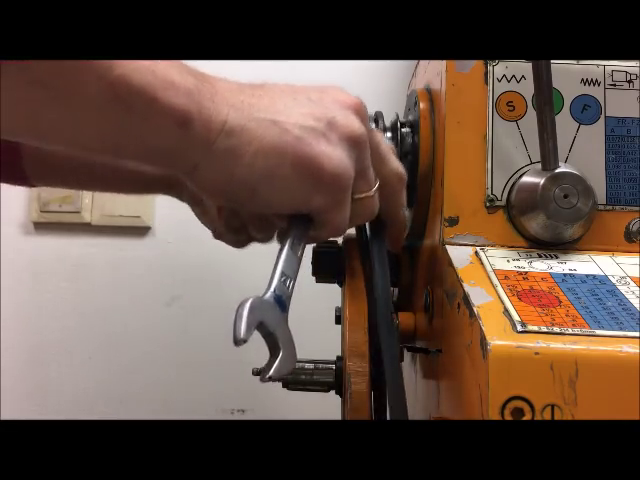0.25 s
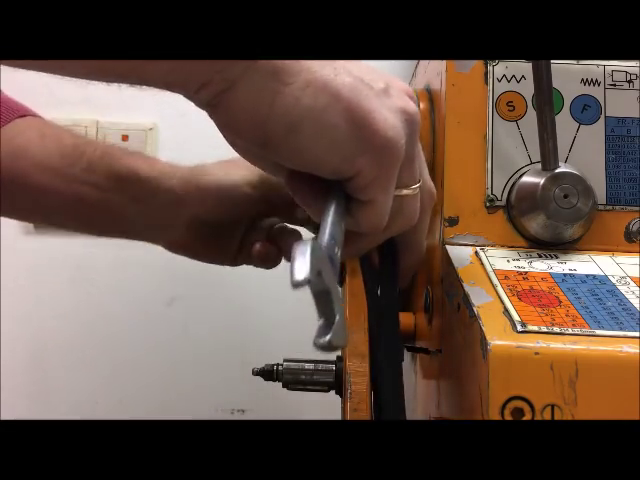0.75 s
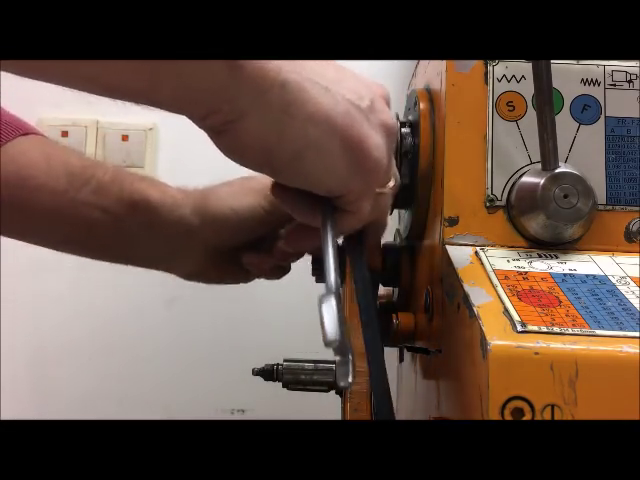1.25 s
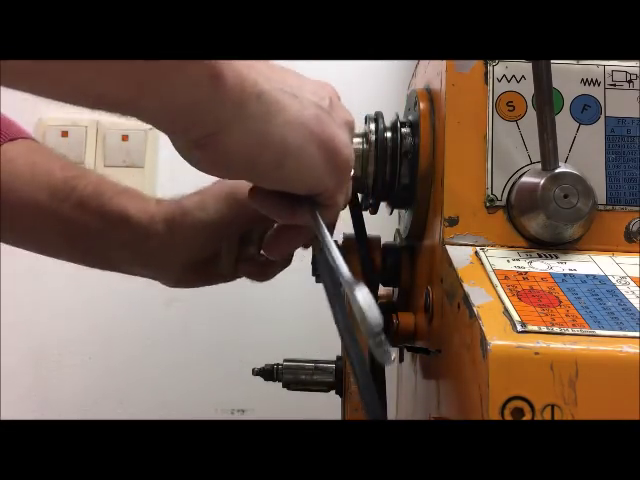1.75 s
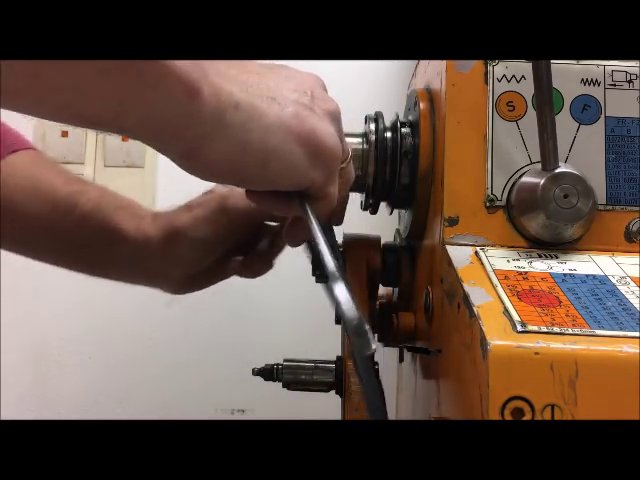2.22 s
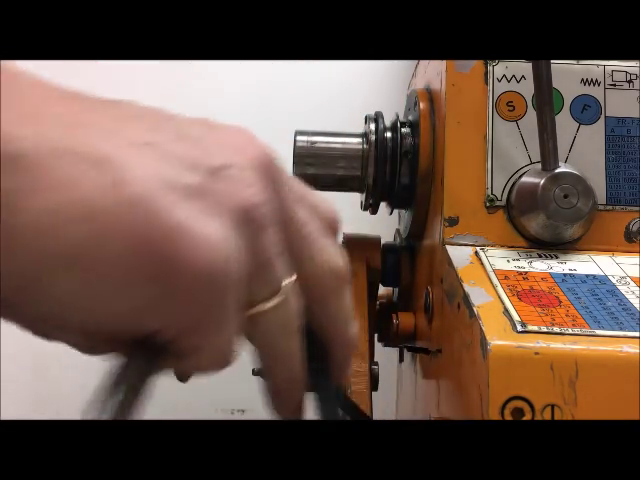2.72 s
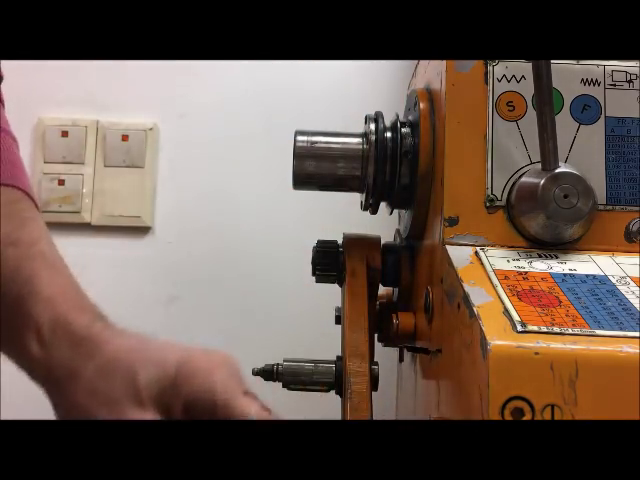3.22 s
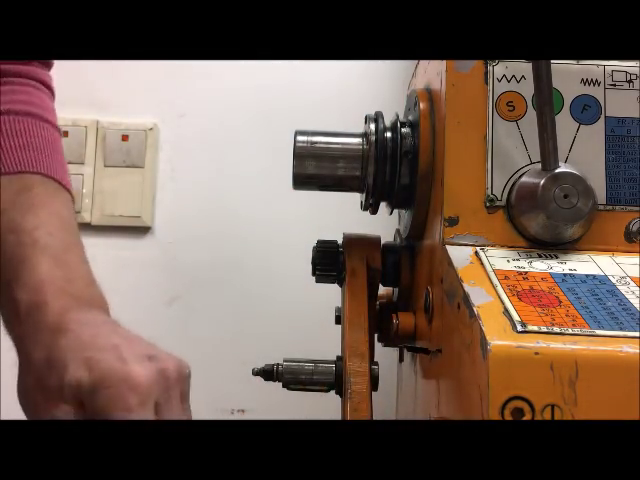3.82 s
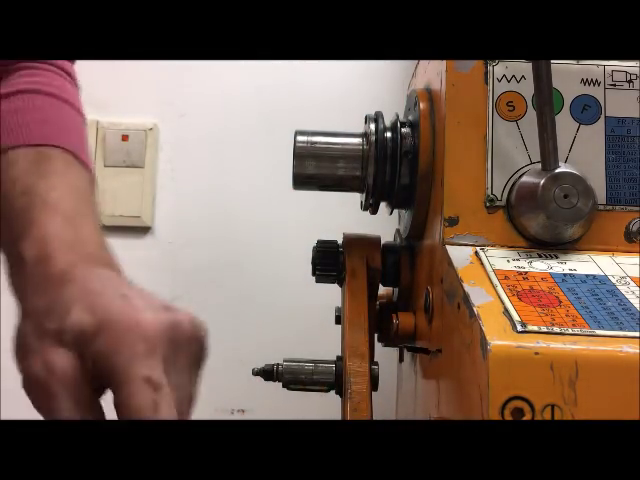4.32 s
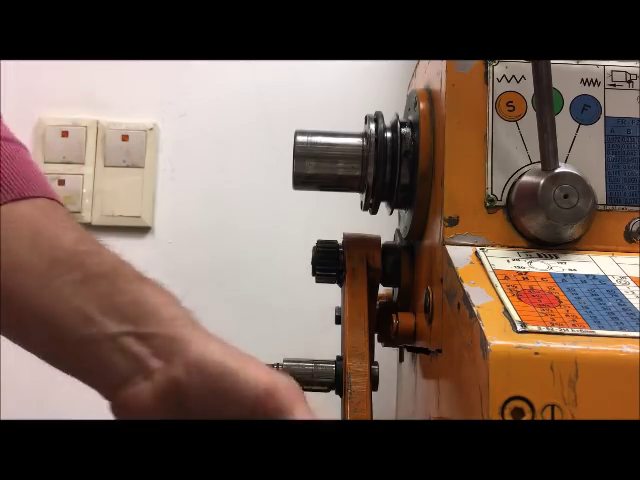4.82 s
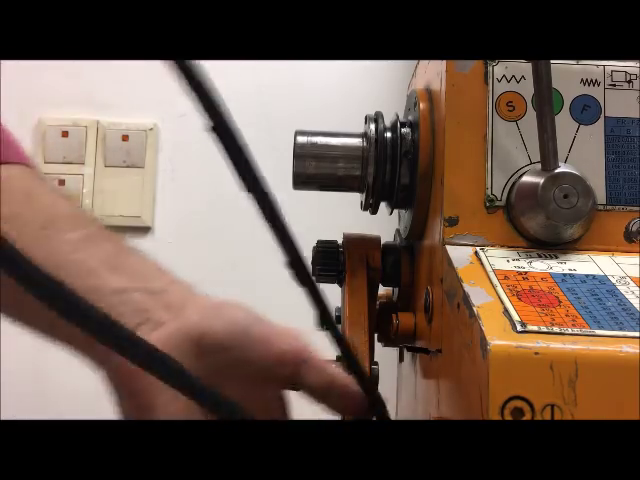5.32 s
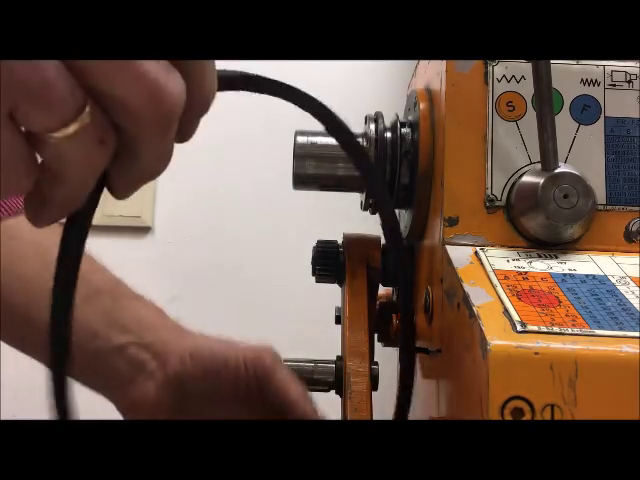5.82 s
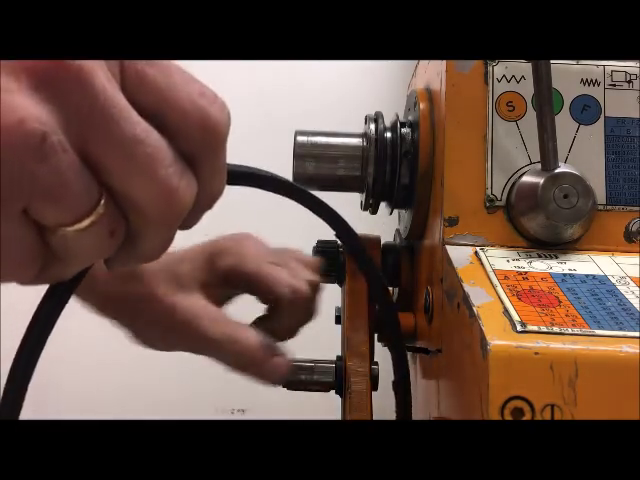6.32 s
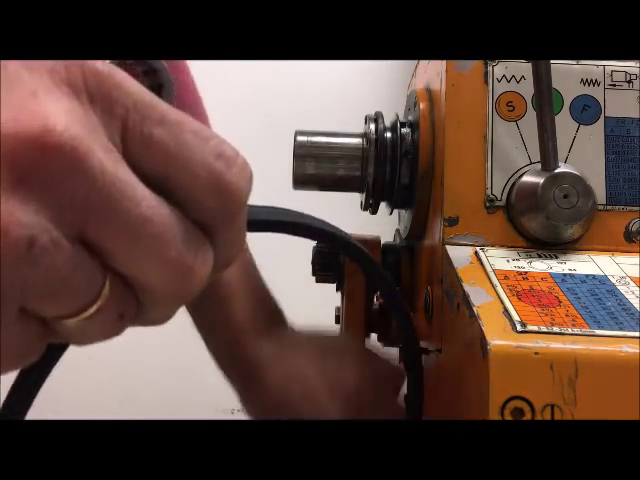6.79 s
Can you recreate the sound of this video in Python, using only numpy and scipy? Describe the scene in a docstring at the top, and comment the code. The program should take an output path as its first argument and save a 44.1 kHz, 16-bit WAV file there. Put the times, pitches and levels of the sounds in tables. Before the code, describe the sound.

A close mono microphone in a small, hard-walled workshop hears a low distant machinery drone and faint even hiss throughout. From 0 seconds a rubber belt is dragged over pulleys in short, grainy, softly humming rubs, with dry snaps around 0.3, 1.0 and a firmer cluster at 1.75. A thin, high whistle-like brushing lingers from 2.2 to 2.7, and small knocks come near 2.4, 2.7 and 3.1. Between 3.4 and 4.7 steel slides on steel in fuzzy, bright ringing strokes, strongest at about 3.8 to 3.9. After a quieter moment, a snap, airy brush and soft low casing boom arrive around 5.2. Sparse clicks and rubs continue, with scraping from 6.65. At 6.9 a metal part slips in a tiny jittery rising squeak, noise swelling steeply, and at 6.96 it slams home: a hugely louder hard clank, its dense metallic ring cut off almost at once by the ending.

```python
"""A small workshop drones and hisses while, close by, a rubber belt is worked off a lathe's pulleys.
From the start the belt rubs, hums and snaps amid grainy brushing: noise shaped by slips and fades.
Later steel slides on steel, ringing in fuzzy resonances, and a soft bump makes the casing boom.
At the end a metal part slips with a rising, jittery squeak, and noise swells steeply beside it.
It slams home with a loud clank: a noise crack, fading sine tones and a dense ring of noise."""
import sys
import numpy as np
from scipy import signal
from scipy.fft import rfft, irfft, next_fast_len
from scipy.io import wavfile

SR = 44100
rng = np.random.default_rng(int(sys.argv[2]) if len(sys.argv) > 2 else 0)


def master_out(mix):
    """Clip the mix to full scale and print it as 16-bit PCM to the path in sys.argv[1]."""
    frames = np.transpose(np.atleast_2d(mix))
    ceiling = np.clip(frames, -1, 1)
    pcm = np.round(ceiling * 32767).astype(np.int16)
    wavfile.write(sys.argv[1], SR, pcm)


N = 311037
TIME = np.arange(N) / SR  # s

# pulls that drag the belt over a rim: (start t/s, length t/s, relative level/dB, hum f/Hz)
BELT_PULLS = [(0, .12, -64, 320), (.265, 0.15, -70, 312), (.33, 0.041, -64.5, 1040),
              (0.964, 0.08, -76, 800), (1.037, 0.073, -73.5, 1600), (1.222, 0.25, -75, 750),
              (1.5, .13, -72.5, 1230), (1.755, 0.098, -66.5, 505), (2.335, 0.056, -69.5, 700),
              (2.71, 0.11, -67.5, 530), (3.03, 0.05, -69, 1000), (3.235, 0.044, -67.5, 1350),
              (3.821, 0.5, -72.5, 724), (4.329, .22, -75.5, 850), (5.22, .085, -58.5, 290),
              (5.82, 0.094, -71.5, 1200), (6.275, 0.043, -73, 520), (6.637, 0.04, -62.5, 540),
              (6.71, 0.26, -69, 710)]
# tone colour of the rubbing: (f/Hz, relative level/dB)
RUB_COLOUR = [(100, -13), (300, 15), (410, -2), (510, 5), (650, 6), (850, 2), (1250, 2), (1650, -4),
              (3200, -5), (5000, -19), (15000, -16)]
# belt snaps and small knocks: (t/s, relative level/dB, centre f/Hz, width/octaves, time to fall 60 dB t/s)
BELT_SNAPS = [(.062, -43.5, 2310, 0.61, .045), (0.268, -44, 1880, 1, 0.051),
              (0.968, -46, 1080, 0.34, 0.046), (.979, -44, 770, 0.26, 0.039),
              (1.108, -48, 2250, 2.2, 0.024), (1.36, -54.5, 2200, 1.7, 0.073),
              (1.731, -54.5, 1250, 0.84, 0.34), (1.766, -40, 1950, 3, 0.025), (1.771, -35, 1030, 1, 0.035),
              (2.429, -41.5, 1770, 1.5, 0.047), (2.689, -40, 1080, 1.4, 0.042),
              (2.855, -43, 950, 0.86, 0.017), (3.041, -46, 2250, 1, 0.037),
              (3.098, -34.5, 1000, 0.5, 0.018), (4.494, -49.5, 2350, 0.5, 0.025),
              (5.19, -51, 1850, 0.31, 0.17), (5.199, -39, 750, 0.44, 0.042), (5.2, -43, 9000, 1.4, 0.025),
              (5.755, -50, 800, 1.4, 0.031), (5.889, -42, 1350, 1.8, 0.016),
              (6.033, -39.5, 1140, 0.89, 0.0086), (6.142, -53.5, 2250, 0.73, 0.072),
              (6.638, -43.5, 1855, 2.7, 0.092), (6.901, -38, 1800, 1, .04)]
# bands of grainy noise: light brushing, a thin whistle near 9.5 kHz, scraping near the end:
# (start t/s, length t/s, relative level/dB, centre f/Hz, width/octaves)
GRAINY_BANDS = [(.118, 0.056, -65, 2550, 0.15), (0.342, 0.074, -67, 11500, 0.54), (.85, .1, -72, 13200, .6),
                (1.02, 0.08, -65.5, 12500, 1.8), (1.715, .07, -68.5, 3000, 1),
                (1.822, 0.075, -63.5, 10500, 2.5), (2.148, 0.058, -66.5, 5130, 0.35),
                (2.2, 0.49, -70.5, 9550, 0.07), (2.28, 0.13, -67, 9500, 2.4), (2.6, 0.14, -65, 11300, 2.1),
                (2.608, .058, -71, 3220, .26), (3.009, 0.13, -66, 2600, 2.1),
                (3.323, 0.044, -66, 2480, 1.3), (3.367, .17, -63, 13700, 0.51),
                (4.513, 0.054, -63.5, 3860, .68), (4.57, .17, -61, 14500, 0.26),
                (4.985, 0.17, -66, 13500, 1.2), (5.147, .026, -57.5, 9000, 3.4),
                (5.167, 0.22, -56.5, 11600, 0.83), (5.197, .11, -69, 2800, .8),
                (5.63, .04, -55.5, 12000, 1.6), (5.767, 0.092, -66.5, 10500, 1.3),
                (6.264, 0.06, -68.5, 2480, 1.8), (6.68, 0.41, -68.5, 2020, 0.27),
                (6.684, 0.31, -71.5, 4700, .37)]
# pulleys and guard answer every touch of the belt: (f/Hz, width f/Hz, level/dB against the touch)
PULLEY_RESONANCES = [(499.5, 27, -23.5), (821, 35, -36.5), (918, 120, -26), (1247, 50, -33),
                     (1643, 120, -25), (2130, 28, -33), (2470, 84, -26.5), (3140, 45, -42)]
# strokes of steel on steel: (start t/s, length t/s, relative level/dB, swell from start to end level/dB)
STEEL_STROKES = [(3.391, 0.097, -67, 3), (3.626, 0.016, -65.5, -2), (3.784, 0.15, -55.5, 7.5),
                 (4.085, 0.048, -64.5, 6), (4.174, 0.09, -64, -3), (4.344, 0.053, -56, -14),
                 (4.637, 0.061, -63, 7), (5.63, 0.027, -63.5, 0)]
# resonances of the sliding steel: (f/Hz, width f/Hz, relative level/dB)
STEEL_RESONANCES = [(3690, 230, 0), (4950, 160, -15), (6640, 340, 1), (8840, 100, -7), (11300, 170, -3),
                    (13800, 190, -10)]
# dry hiss of the sliding steel: (f/Hz, relative level/dB)
STEEL_HISS_COLOUR = [(300, 5), (700, -12), (2000, -4.5), (5000, 1.5), (7800, -1), (10300, -4.5),
                     (12500, 3), (16000, -6)]
# resonances of the bumped casing: (f/Hz, width f/Hz, relative level/dB)
BUMP_RESONANCES = [(141.0, 30, 5.5), (220, 74, -5), (320, 110, -14.0)]
# the squeak is loud where its pitch meets a resonance of the part: (f/Hz, width f/Hz, relative level/dB)
SQUEAK_RESONANCES = [(3400, 480, -33), (4950, 550, -36), (6350, 300, -50)]
# colour of the noise that goes with the squeak: (f/Hz, relative level/dB)
SCRAPE_COLOUR = [(60, -7), (150, -2), (400, -3), (1000, 2.5), (2000, -11), (3400, -3), (4500, -12),
                 (6300, -6), (9000, -15), (16000, -21)]
# ringing modes of the struck part: (f/Hz, relative level/dB, time to fall 60 dB t/s)
PART_MODES = [(61, -19.5, .3), (100, -37, 0.36), (154, -14.5, 0.44), (204.4, -11, 0.28), (406, -13.5, 0.17),
              (631, -10.5, 0.25), (784, -22, 0.13), (952, -17.5, 0.33), (980, -19, 0.43), (1052, -17, 0.18),
              (1092, -34, 0.11), (1330, -23, 0.089), (1655, -7, 0.043), (1870, -26, 0.15),
              (2123, -12.5, 0.026), (2282, -28, 0.21), (2970, -35, 0.14), (3310, -16, 0.025),
              (5840, -33, .17), (6450, -29, 0.16)]
# colour of the dense ring of casing and room: (f/Hz, relative level/dB)
CASING_COLOUR = [(30, -23), (70, -3), (200, 2.5), (500, -3.5), (1100, -3), (2200, -14.5), (4000, -21),
                 (8000, -25.5), (13000, -23), (16000, -27)]
# how long that dense ring takes to fall 60 dB: (f/Hz, t/s)
CASING_T60 = [(100, 0.32), (1000, 0.2), (3000, .18), (8000, 0.18), (15000, 0.13)]
# the dense ring builds up as the walls answer after the direct sound: (t/s after the strike, gain)
WALL_ANSWER = [(0, 0), (.003, .45), (.012, .52), (.017, 1)]
# how long the room's tail takes to fall 60 dB: (f/Hz, t/s)
ROOM_T60 = [(200, 0.34), (2000, 0.2), (14000, 0.24)]
# low resonances of the room, kept droning by distant machinery: (f/Hz, width f/Hz, level/dB)
DRONE_RESONANCES = [(54.8, 21, -60.5), (69.32, 4.3, -54), (96.7, 6.6, -58), (128.4, 17.8, -54),
                    (138.5, 16.3, -52.5), (181.5, 23.7, -60), (284.7, 57, -75.5), (497.4, 24, -86)]
# colour of the air of the workshop: (f/Hz, relative level/dB)
AIR_COLOUR = [(100, -8), (280, 2), (400, 2.5), (650, -2), (1200, -6), (2500, -7.5), (4900, -12), (6400, -8),
              (7700, -13.5), (9500, -5.5), (10400, -11.5), (12200, -5.5), (15700, -11.5)]

# names ending in _S are in seconds, _HZ in hertz, _DB in decibels; T60 is the time to fall 60 dB
DRAG_ATTACK_S, DRAG_T60_S = 0.019, .22
DRAG_SWELL_DB = -2.5  # a pull eases as the belt gives
HUM_DB, HUM_OCTAVES = -2.5, 0.23  # level change for the hum beside the rubbing, and its width
GRIP_DB = -83.5  # faint rubbing that goes on between the pulls, before its flutter
SLIDE_ATTACK_S, SLIDE_T60_S = 0.015, 0.13
SLIDE_WOBBLE_DB = 1.5  # the hand presses unevenly
BUMP_S, BUMP_LENGTH_S, BUMP_DB = 5.228, 0.057, -46.5  # level before the casing's resonances
BUMP_ATTACK_S, BUMP_T60_S = 0.018, .38
SLIP_S, CLANK_S = 6.902, 6.9595  # the part slips, then strikes
SQUEAK_START_HZ, SQUEAK_END_HZ, GLIDE_S = 2950, 6350, .023  # pitch before jitter
SQUEAK_JITTER, SQUEAK_FLUTTER_DB = .04, 3  # jitter is a fraction of the pitch
SCRAPE_DB, SCRAPE_ATTACK_S = -49.5, .012  # level before the swell
SWELL_DB, SWELL_S = 26, 0.0057  # noise swells steeply in the last milliseconds before the clank
AIR_DB = -67
EDGE_HZ = 15800  # upper limit of the sound


def amp(db):
    """Turns decibels into a gain."""
    return 10 ** (np.asarray(db) / 20)


def unit(x):
    """Scales x to an average strength (rms) of one."""
    return x / np.sqrt(np.mean(abs(x) ** 2) + 1e-20)


def noise(count):
    """White noise: equally strong at all pitches."""
    return rng.standard_normal(count)


def at_hz(points, hz):
    """Reads a curve between its points on a logarithmic frequency axis."""
    f, value = np.transpose(points)
    return np.interp(np.log(hz + 1), np.log(f + 1), value)


def colour(x, points):
    """Makes some pitches of x stronger than others, then sets its rms to one."""
    f = np.fft.rfftfreq(len(x), 1 / SR)
    gain = amp(at_hz(points, f))
    return unit(irfft(rfft(x) * gain, len(x)))


def band(x, hz, octaves):
    """Keeps a bell-shaped band around hz, with an rms of one."""
    f = np.fft.rfftfreq(len(x), 1 / SR) + 1
    bell = np.exp(-.5 * (np.log2(f / hz) / octaves) ** 2)
    return unit(irfft(rfft(x) * bell, len(x)))


def resonances(x, modes):
    """Lets x drive steep resonances, each strong only near its own pitch."""
    size = next_fast_len(len(x))
    f = np.fft.rfftfreq(size, 1 / SR)
    gain = sum(amp(db) * unit(1 / (1 + 2j * (f - hz) / width) ** 2) for hz, width, db in modes)
    return irfft(rfft(x, size) * gain, size)[:len(x)]


def wander(per_s):
    """Random drift through per_s new values a second, with an rms of one."""
    knots = noise(N)
    return unit(np.interp(TIME * per_s, np.arange(len(knots)), knots))


def friction(slips_per_s, smooth):
    """Tiny slips of uneven size over a smooth hiss."""
    slips = rng.laplace(size=N) * (rng.random(N) < slips_per_s / SR)
    return unit(unit(slips) + smooth * noise(N))


def fall(t, t60):
    """Steady die-away: 60 dB lower after t60 seconds."""
    return np.exp(-np.log(1000) * t / t60)


def stroke(length, attack_s, t60, swell_db=0):
    """Loudness of one movement: it sets in, holds while swelling or easing, and dies away."""
    t = np.arange(round((length + t60) * SR)) / SR
    held = amp(swell_db * (np.minimum(t / length, 1) - .5))
    return np.minimum(t / attack_s, 1) * held * fall(np.maximum(t - length, 0), t60)


def dying(x, t60s):
    """Lets each band of x die at its own speed."""
    hz, t, z = signal.stft(x, SR, nperseg=256)
    fade = amp(-60 * t / at_hz(t60s, hz)[:, None])
    return signal.istft(z * fade, SR, nperseg=256)[1][:len(x)]


def add(mix, s, sound):
    """Mixes a sound in at time s, cutting it off at the end of the mix."""
    part = mix[max(round(s * SR), 0):][:len(sound)]
    part += sound[:len(part)]


def rubbing():
    """Each pull drags rubber over the rims in small slips and makes the stretch of belt hum."""
    force, hum = np.full(N, amp(GRIP_DB)), np.zeros(N)
    for s, length, db, hz in BELT_PULLS:
        pull = amp(db) * stroke(length, DRAG_ATTACK_S, DRAG_T60_S, DRAG_SWELL_DB)
        add(force, s, pull)
        tone = band(noise(2 * SR), hz, HUM_OCTAVES)
        add(hum, s, pull * tone[:len(pull)])
    drag = colour(friction(slips_per_s=600, smooth=0.88), RUB_COLOUR)
    flutter = amp(2.9 * wander(per_s=30))
    return drag * force * flutter + amp(HUM_DB) * hum


def snaps():
    """The belt lets go of a rim: a short, well damped knock made of a band of noise."""
    out, t = np.zeros(N), np.arange(4096) / SR
    for s, db, hz, octaves, t60 in BELT_SNAPS:
        fade = fall(t, t60) * (1 - np.exp(-t / .0005))
        knock = band(noise(len(t)), hz, octaves) * fade
        # the energy follows the fade, whatever the noise happens to be
        add(out, s, amp(db) * knock * np.linalg.norm(fade) / np.linalg.norm(knock))
    return amp(-6.5) * out


def grainy_bands():
    """Bands of grainy noise: light brushing, a thin whistle near 9.5 kHz, scraping near the end."""
    out, grain = np.zeros(N), friction(slips_per_s=2400, smooth=1.0)
    for s, length, db, hz, octaves in GRAINY_BANDS:
        piece = grain[round(s * SR):][:round(length * SR)]
        puff = band(piece, hz, octaves)
        add(out, s, amp(db) * puff * signal.windows.tukey(len(puff), .8))
    return out


def sliding():
    """Friction keeps steel singing in fuzzy resonances; a dry hiss goes along, slightly stronger in hard strokes."""
    slips, force = friction(slips_per_s=2400, smooth=0.47), np.zeros(N)
    for s, length, db, swell_db in STEEL_STROKES:
        add(force, s, amp(db) * stroke(length, SLIDE_ATTACK_S, SLIDE_T60_S, swell_db))
    force = force * amp(SLIDE_WOBBLE_DB * wander(per_s=45))
    song = unit(resonances(slips, STEEL_RESONANCES)) * amp(2.4 * wander(per_s=70))
    hiss = amp(-3.0) * colour(slips, STEEL_HISS_COLOUR)
    hiss_share = (force / force.max()) ** 0.1
    return force * (song + hiss * hiss_share)


def bump():
    """A soft push makes the casing boom briefly in its low resonances."""
    push = np.zeros(N)
    add(push, BUMP_S, amp(BUMP_DB) * stroke(BUMP_LENGTH_S, BUMP_ATTACK_S, BUMP_T60_S))
    return push * resonances(noise(N), BUMP_RESONANCES)


def squeak():
    """Metal slips with a broken, rising chirp; noise beside it swells steeply just before the clank."""
    slipping = (TIME >= SLIP_S) * (TIME < CLANK_S)
    # the pitch climbs smoothly, then holds
    glide = np.sin(np.pi / 2 * np.clip((TIME - SLIP_S) / GLIDE_S, 0, 1)) ** 2
    hz = SQUEAK_START_HZ + (SQUEAK_END_HZ - SQUEAK_START_HZ) * glide
    answer = sum(amp(db) / (1 + (2 * (hz - mode_hz) / width) ** 2)
                 for mode_hz, width, db in SQUEAK_RESONANCES)
    jitter = 1 + SQUEAK_JITTER * wander(per_s=2500)
    phase = 2 * np.pi * np.cumsum(hz * jitter) / SR
    tone = np.sin(phase) + amp(-10.5) * np.sin(2 * phase)  # with a weaker octave above
    chirp = tone * answer * amp(SQUEAK_FLUTTER_DB * wander(per_s=410))
    swell_db = SWELL_DB * np.exp(-abs(TIME - CLANK_S) / SWELL_S)
    loudness = np.clip((TIME - SLIP_S) / SCRAPE_ATTACK_S, 0, 1) * amp(SCRAPE_DB + swell_db)
    scrape = loudness * colour(noise(N), SCRAPE_COLOUR)
    return slipping * (chirp + scrape)


def clank():
    """A hard crack, then the modes of the part, then the dense ring of casing and room."""
    out, t = np.zeros(N), np.arange(SR // 2) / SR
    rise = t / 0.00094  # the crack's envelope peaks after 0.94 ms
    crack = amp(-9.0) * band(noise(len(t)), hz=4070, octaves=2.3) * rise * np.exp(1 - rise)
    ring = np.zeros(len(t))
    for hz, db, t60 in PART_MODES:
        age = np.maximum(t - 0.1249 / np.sqrt(hz), 0)  # bending waves: the low modes arrive late
        ring += amp(db) * np.sin(2 * np.pi * hz * age) * fall(age, t60)
    dense = amp(-4.5) * dying(colour(noise(len(t)), CASING_COLOUR), CASING_T60)
    answer_s, answer_gain = np.transpose(WALL_ANSWER)
    build = np.interp(t, answer_s, answer_gain)
    add(out, CLANK_S, crack + amp(1) * ring + dense * build)
    return out


def room(x):
    """Hard walls send back a short, dense tail, modelled as dying noise."""
    tail = dying(noise(SR // 2), ROOM_T60)
    tail[:SR // 200] = 0  # nothing comes back in the first 5 ms
    return signal.fftconvolve(x, tail / np.linalg.norm(tail))[:N]


def workshop():
    """Noise drives the room's low resonances into a drone, under a faint even hiss."""
    drone = resonances(noise(N), DRONE_RESONANCES)
    return drone + amp(AIR_DB) * colour(noise(N), AIR_COLOUR)


def scene():
    """The belt stirs the pulleys; all handling sounds in the room; then the clank."""
    belt = rubbing() + grainy_bands() + snaps()
    pulleys = resonances(belt, PULLEY_RESONANCES)
    handling = belt + pulleys + bump() + sliding() + squeak()
    mix = workshop() + handling + amp(-14.5) * room(handling) + clank()
    return mix[None]  # one channel


def record(dry):
    """The loudest peaks are rounded off at full scale; then the highest pitches are cut away."""
    rounded = dry / (1 + dry ** 8) ** (1 / 8)
    low_pass = signal.firwin(511, EDGE_HZ, window=("kaiser", 9), fs=SR)
    return signal.oaconvolve(rounded, low_pass[None], "same")


dry = scene()
out = record(dry)
master_out(out)
```